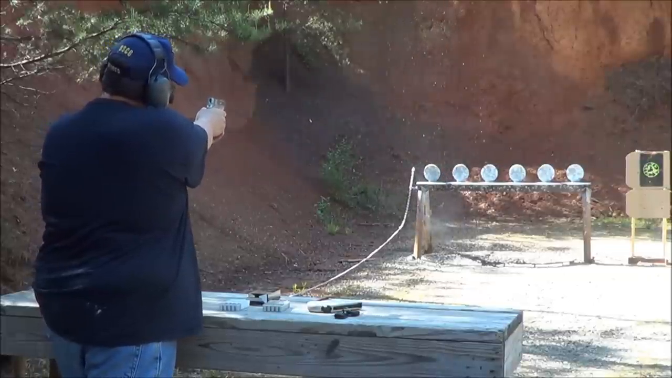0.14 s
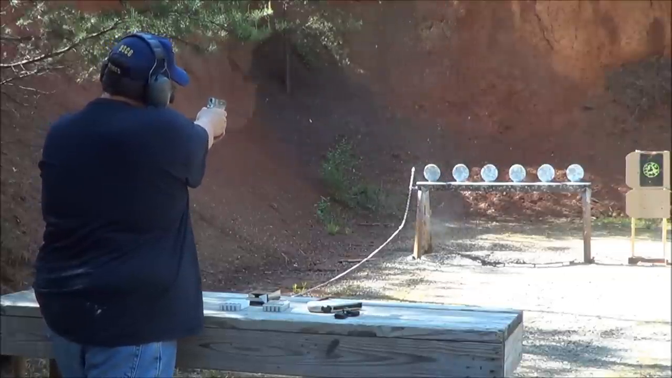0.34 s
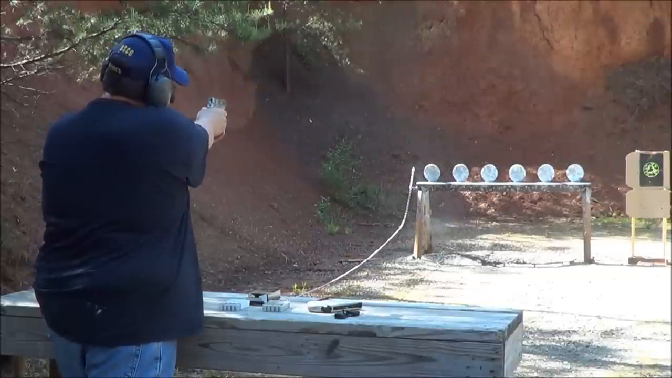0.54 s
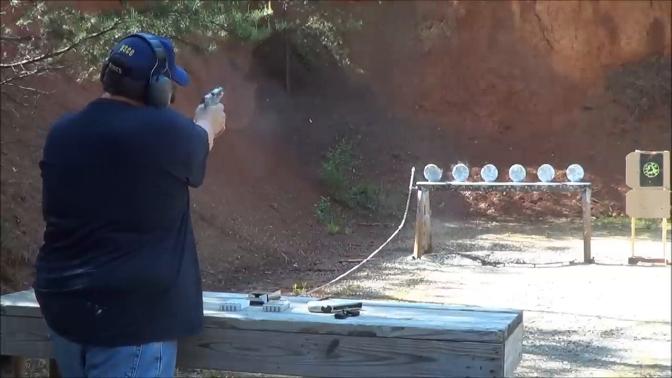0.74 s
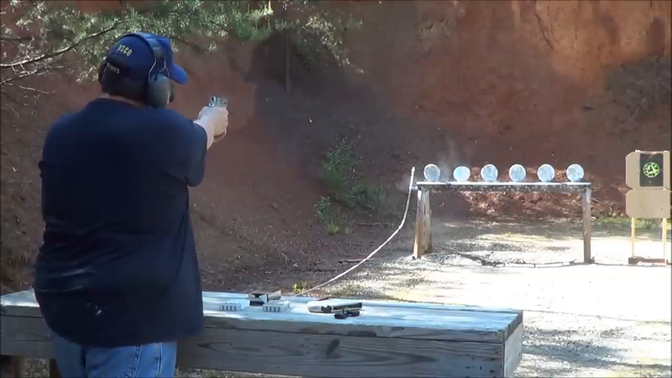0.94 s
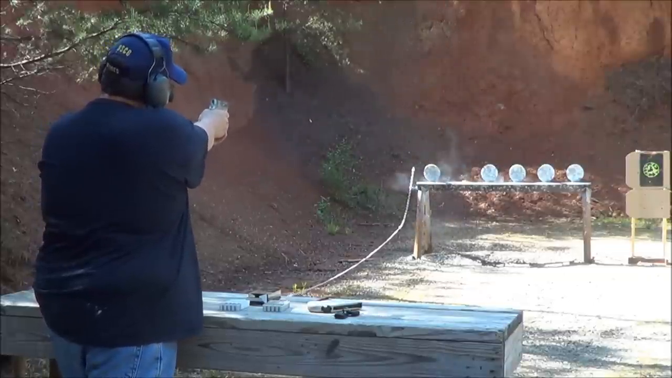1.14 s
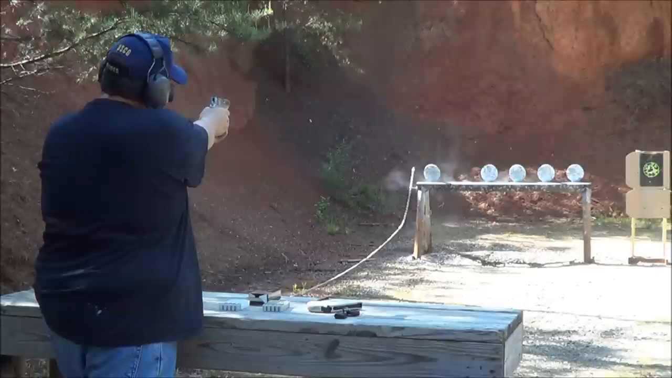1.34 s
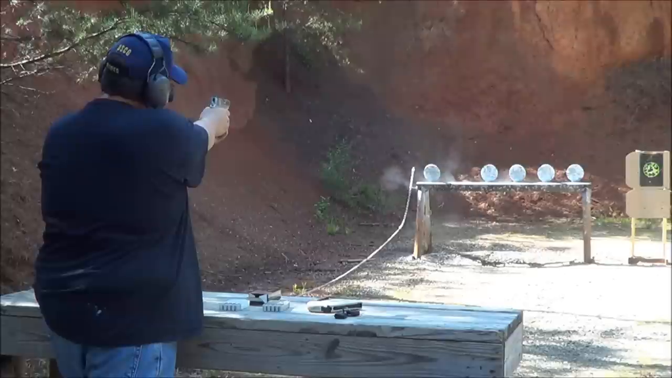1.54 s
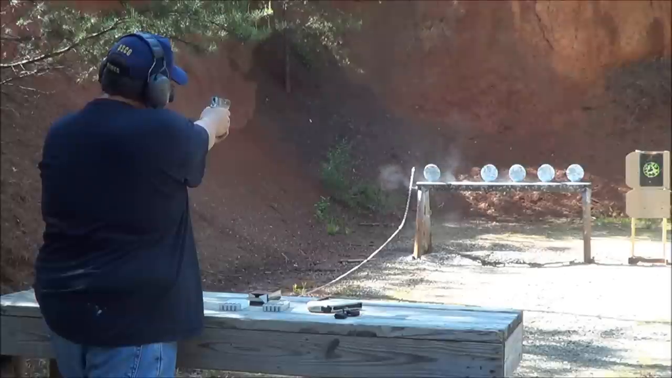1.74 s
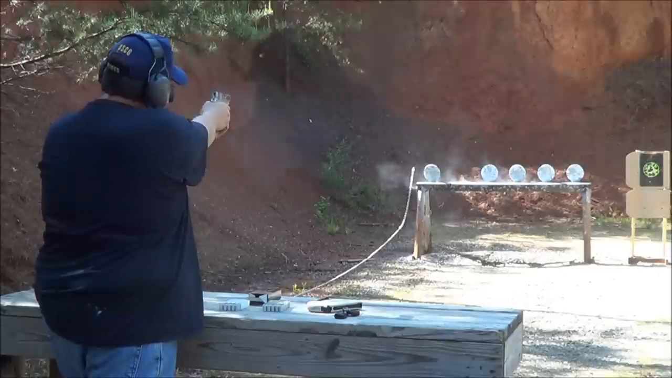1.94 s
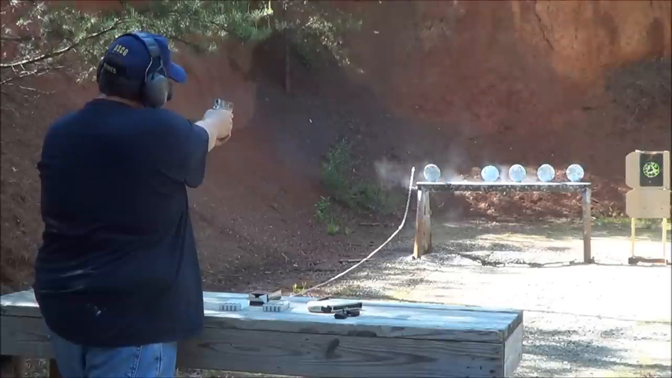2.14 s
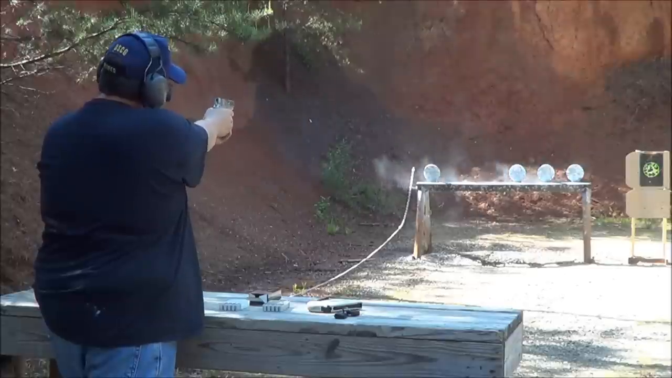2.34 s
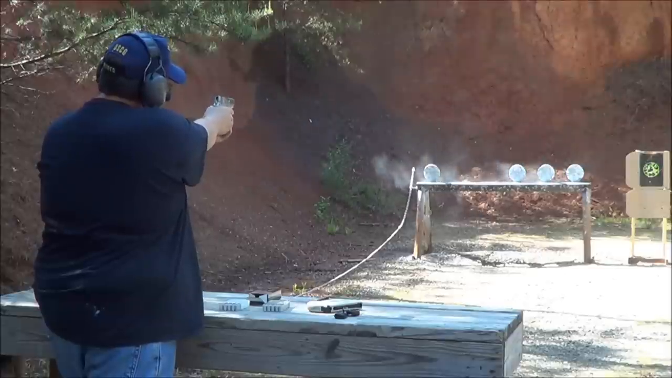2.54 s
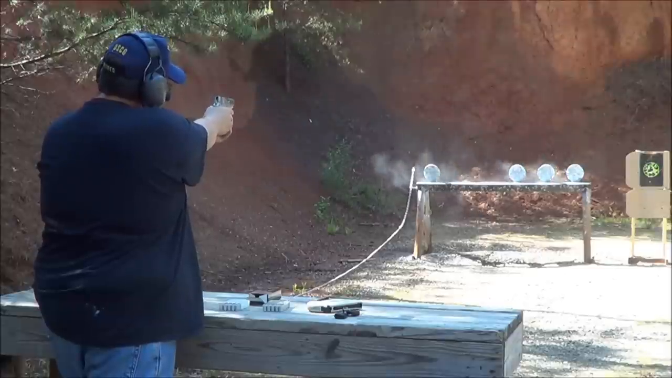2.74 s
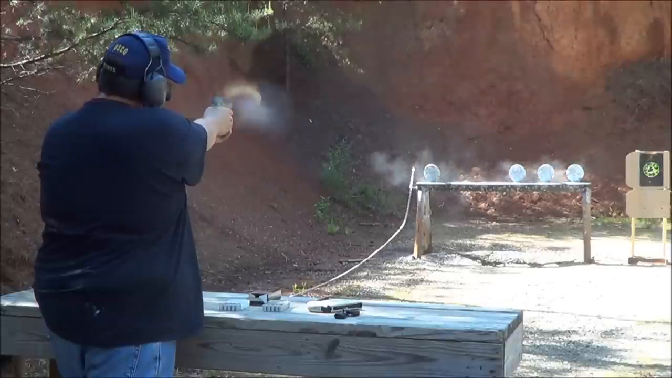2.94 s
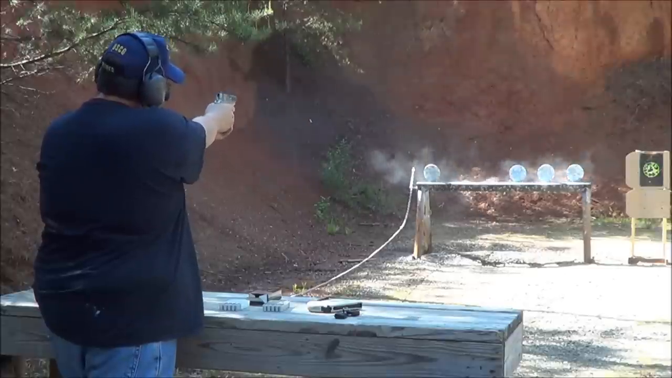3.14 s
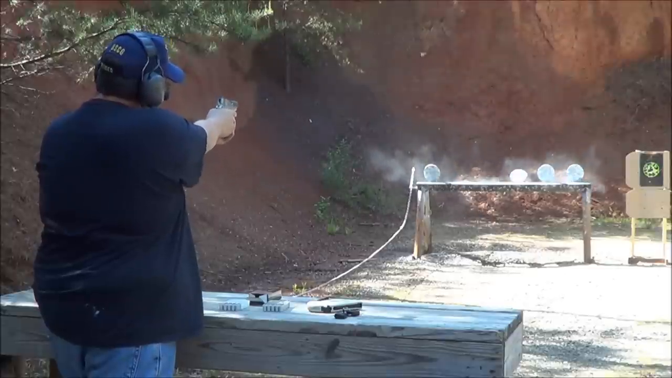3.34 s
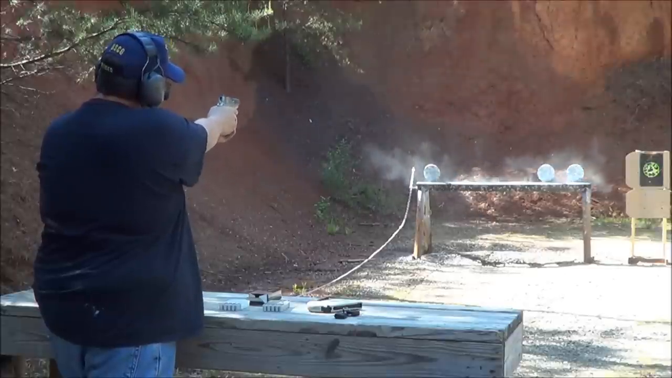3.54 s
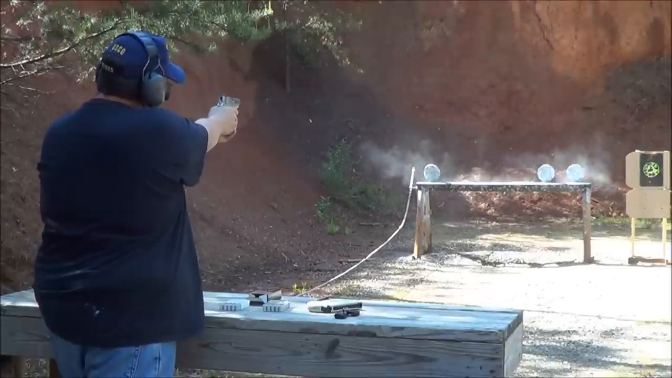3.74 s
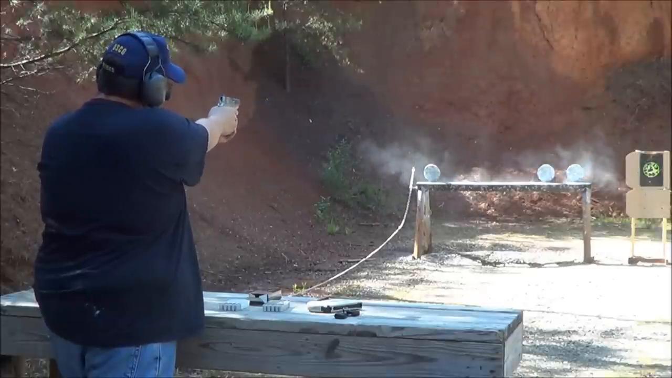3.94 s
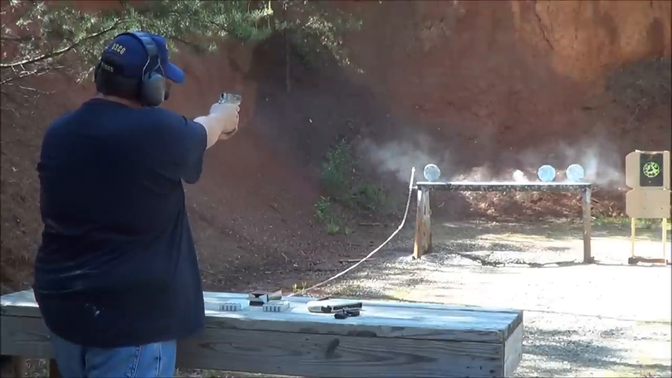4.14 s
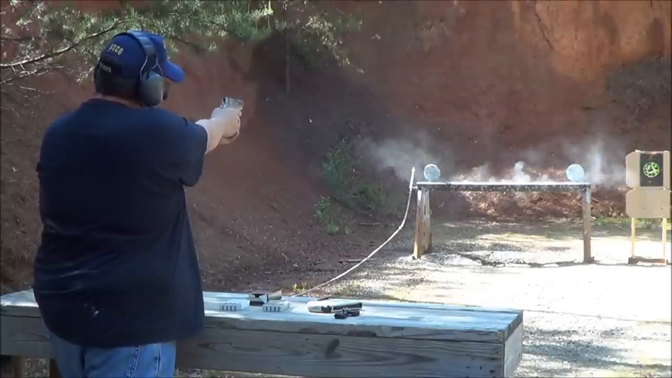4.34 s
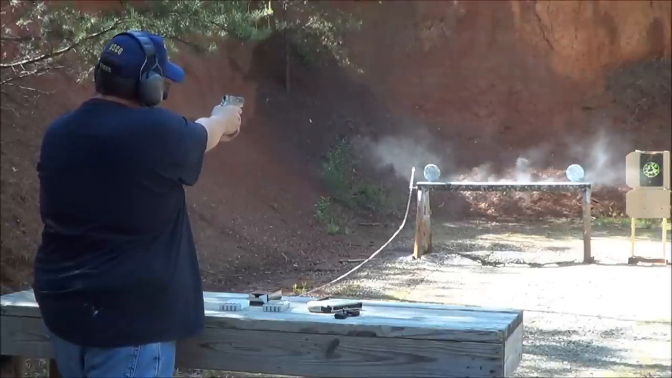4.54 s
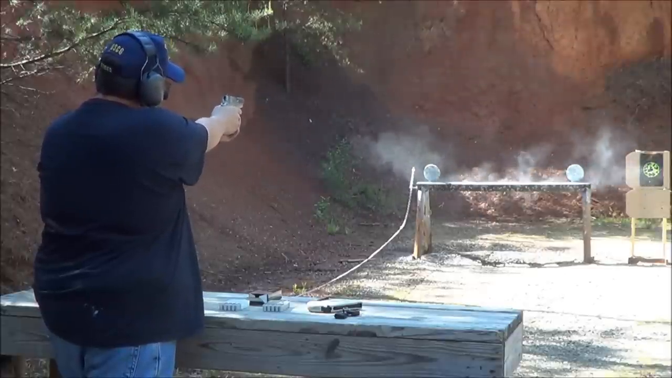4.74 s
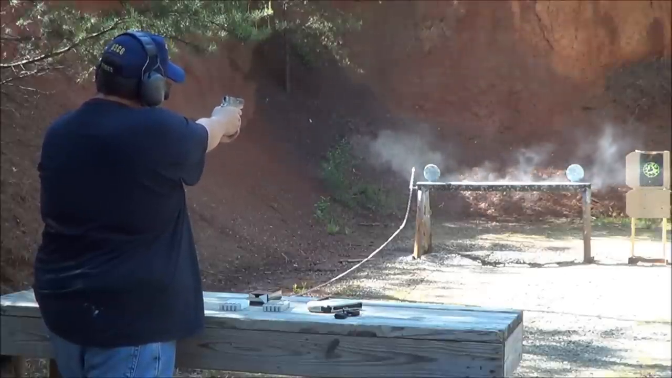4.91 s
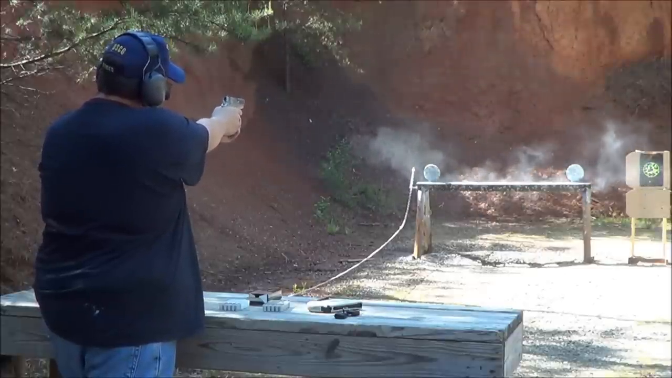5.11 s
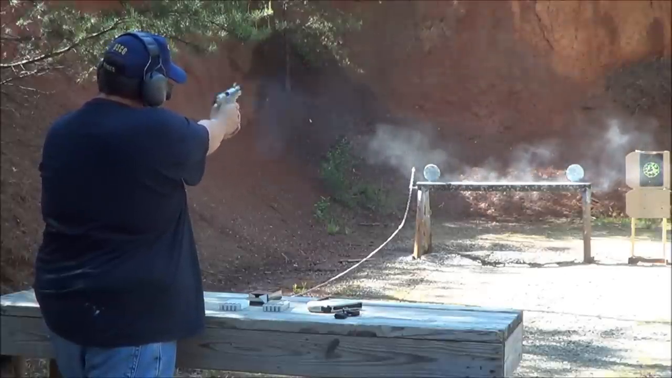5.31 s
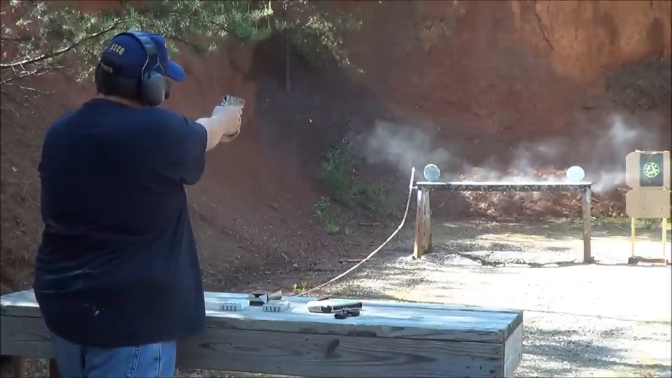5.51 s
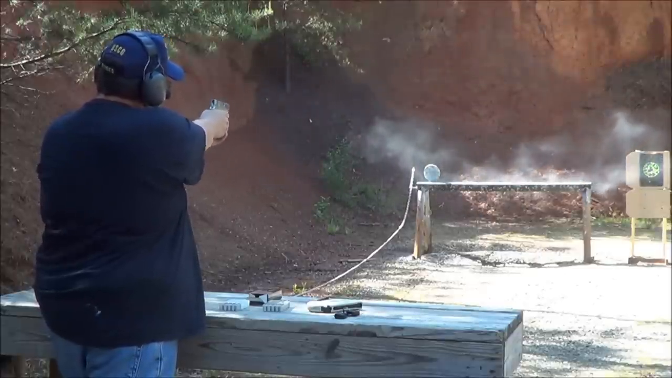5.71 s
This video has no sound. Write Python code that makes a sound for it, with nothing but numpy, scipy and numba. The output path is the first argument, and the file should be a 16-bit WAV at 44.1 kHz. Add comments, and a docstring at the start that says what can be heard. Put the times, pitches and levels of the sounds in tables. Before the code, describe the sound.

Five spaced pistol shots outdoors, each answered by a ringing steel plate and a clattering slam, with echoes rolling and brass cases tinkling.

```python
"""Five pistol shots at an outdoor range, each blast rolling round an earth bank and woods; an earlier one still echoes.
Blasts are bands of noise shaped by an opening crack, near and far echoes; plates and rack are fading modes and noise.
Bullets ring the steel plates, the plates slam back on their rack and bounce, and brass cases tinkle on the ground.
Behind lie a quiet outdoor hush of noise bands and a thin electronic whine.
The camera's stereo microphone pair feeds a limiter, then a bass cut, soft clipping and a treble cut."""
import sys
import numpy as np
from scipy import signal
from scipy.io import wavfile
from scipy.ndimage import uniform_filter1d, minimum_filter1d, map_coordinates
from numba import njit

SR = 44100
rng = np.random.default_rng(int(sys.argv[2]) if len(sys.argv) > 2 else 0)


def generate_wav(signal):
    """Clip the signal to [-1, 1] and save it as 16-bit WAV at the path in sys.argv[1]."""
    frames = np.transpose(np.atleast_2d(signal))
    scaled = np.clip(frames, -1, 1) * 32767
    pcm = np.round(scaled).astype(np.int16)
    wavfile.write(sys.argv[1], SR, pcm)


N = 254456  # samples in the scene
LEAD = SR + SR // 4  # samples played before the start
TOP_HZ = 16000
BANDS_HZ = 35 * 2 ** (np.arange(27) / 3)  # third-octave centres

# Width of the microphone pair. Each row: frequency in Hz, side minus mid in dB.
WIDTH = [(60, -9), (300, -12.5), (900, -6), (3000, -9.5), (7500, -4.5), (15000, -38)]
# Lean of the microphone pair. Each row: frequency in Hz, left minus right in dB.
LEAN = [(40, 2), (150, -2), (400, -3), (1200, -0.5), (15000, -0.1)]
# Colour of the outdoor hush. Each row: frequency in Hz, relative density in dB per Hz.
HUSH = [(24, -52), (40, -29), (108, 0.5), (606, -2), (998, 4.5), (4130, -19), (11800, -21.5), (13000, -49),
        (15500, -8)]
# Brass cases landing and bouncing.
# Each row: start in seconds, tick level in dB, mouth note in Hz, ring in Hz, ring level in dB.
CASE_LANDINGS = [(.001, -64, 5450, 12080, -45), (0.256, -28.5, 4350, 12060, -32.5),
                 (0.345, -33.5, 5400, 12030, -45), (.4677, -33.5, 5100, 12060, -39),
                 (0.503, -34, 4740, 12030, -32), (.548, -44, 4860, 12030, -43),
                 (.601, -50, 5000, 12000, -43.5), (.657, -49, 5500, 12030, -58),
                 (1.5837, -21, 5415, 11510, -28.5), (2.272, -45, 5600, 11400, -37),
                 (2.726, -21, 5355, 11540, -24.5), (3.215, -50, 5500, 11504, -27),
                 (3.385, -55, 5500, 11510, -38), (3.843, -16, 5600, 11580, -28.5),
                 (4.802, -42, 5670, 11562, -47), (4.8586, -17.5, 5100, 11430, -24.5),
                 (5.0276, -45, 12500, 11400, -65)]
# Plates slamming on the rack and bouncing. Each row: start in seconds, level in dB, share of the full ringing time.
PLATE_SLAMS = [(1.2130, -10, 1.6), (1.2742, -35, 1.1), (2.4359, -9, 1.14), (2.636, -21.5, 0.54),
               (2.713, -29.5, 2.5), (2.772, -28.5, 0.86), (2.874, -33, 0.94), (2.955, -28.5, 1.1),
               (3.5501, -12.5, 1.45), (3.711, -23.5, 1.83), (3.921, -34.5, 0.75), (4.4400, -11.5, 1.23),
               (4.592, -24.5, 1.54), (5.7598, -14, 1.5)]
# First crack of steel on steel. Each row: centre in Hz, relative level in dB, full t60 in seconds.
CLANG_BANDS = [(158, -31.5, 0.24), (1690, -8.5, 0.22), (2080, -18.5, 0.99), (3170, -11, 0.56),
               (10600, -19, 0.16)]
# Clatter of the rack. Each row: frequency in Hz, relative level in dB, full t60 in seconds.
RATTLE_BANDS = [(120, -59, 0.11), (387, -8, 0.35), (930, -8, 0.68), (1600, -3.5, 0.76), (3000, -2.5, 0.71),
                (5030, -1, 0.66), (7940, -8.5, 0.56), (11230, 7.5, 0.47), (15300, -50, 0.19)]
# Modes of the rack. Each row: frequency in Hz, relative level in dB, full t60 in seconds.
RACK_MODES = [(1470, -13, 0.31), (1894, -12, 0.32), (1964, -17, 0.25), (2320, -20.5, 0.58),
              (2480, -20, 0.52), (2580, -41, 0.18), (2790, -14.5, 0.28), (3123, -16, 0.66),
              (3173, -20.5, 0.83), (3540, -30, 0.59), (3950, -36, 0.28), (5260, -14.5, 0.15),
              (10800, -22, 0.35), (10720, -15.5, 0.33)]
# Ringing of a plate. Each row: frequency in Hz, level in dB when struck near its belly, t60 in seconds.
PLATE_MODES = [(2589, -20, 1.36), (5450, -23, 1.3), (5790, -23, .4), (8818, -24, .7), (9082, -16, .55),
               (9297, -17, .57), (9873, -18, .3), (10066, -19, .5), (14335, -40, .98)]
# Bullet strikes. Each row: start in seconds, ring level in dB,
# places in PLATE_MODES of the modes whose bellies the bullet lands near.
BULLET_STRIKES = [(.836, 0, [4, 6]), (1.974, 0, [0, 1, 3, 8]), (3.075, -5, [2, 3, 4, 7]),
                  (4.101, -2, [3, 5, 8]), (5.405, -3, [0, 2, 7])]
# Lead splashing off the plate. Each row: centre in Hz, level in dB, t60 in seconds.
LEAD_SPLASH = [(5500, -15, 0.21), (9900, -21, 0.39)]
# The range answering a blast.
# Each row: frequency in Hz, near echoes in dB, their t60 in seconds, far woods in dB, their t60 in seconds.
RANGE_ANSWER = [(40.4, -23, 0.36, -59, 2.3), (121, -48.5, 1, -53.5, 2.4), (159, -16.5, 0.46, -66, 2.2),
                (255, -14.5, 0.24, -33, 2.24), (443, -13, 0.56, -22, 2.55), (1030, -7.5, 0.66, -12, 2.1),
                (1500, -7.5, 0.27, -16.5, 1.77), (2390, -8.5, 0.89, -15.5, 1.96),
                (2780, -10.5, 0.87, -24, 1.92), (3940, -9.5, 0.74, -17.5, 1.52),
                (7900, -12, 0.75, -39, 1.4), (10270, -3.5, 0.55, -57, 0.67), (15000, -19, 0.3, -62, 0.79)]
# The crack of the shot itself, then ground, bench and walls near the shooter, then the bank and tree lines.
# Each row: delay in seconds, gain over the near echoes in dB, spread in seconds, centre in Hz, width in octaves.
CRACK_AND_REFLECTORS = [(0, 25, 0.0054, 4500, 7), (.004, 19, 0.012, 2440, 3.9),
                        (0.017, 9, 0.018, 1400, 1.4), (0.036, 9.5, 0.0053, 1160, 2.2),
                        (0.071, 19, 0.0044, 1520, 1.6), (0.103, 14, 0.0076, 410, 0.58),
                        (.142, 22.5, 0.018, 483, .45), (.175, 16, 0.016, 224, 0.89),
                        (.32, 15, 0.055, 585, 0.2), (0.366, 29, 0.059, 262, 0.47)]
# The five shots, each a start in seconds.
SHOT_TIMES = [.7577, 1.8935, 2.9930, 4.0182, 5.3352]
# The shot before them: start in seconds, level in dB.
EARLIER_SHOT = (-1.0, 0)

AIR_DB = -53.5
WHINE_HZ, WHINE_DB = 15740, -78  # level is rms
CASE_T60_S, BEAT_HZ = 0.31, 75  # ring of a case; typical split of its mode pair
MOUTH_T60_S, MOUTH_DB = 0.0055, 2.5  # level relative to the tick
STEEL_PAN = 0.16  # each steel mode beams its own way: spread of the side share
SLAM_RISE_S, RISE_LOG_PER_DB = 0.0011, -0.08  # rise of the loudest slam; log change per dB below it
OFF_BELLY_DB = -17  # plate modes away from whose bellies the bullet lands
BLAST_DB = -3.5
LUMPS_DB, LUMPS_PER_S = 1.6, 90  # returns arrive in clumps
LIMIT_DB, LIMIT_RATIO = -10, 10.3
ATTACK_S, RELEASE_S, AHEAD = .0002, .012, 100  # AHEAD in samples
LOW_CUT_HZ = 187


def undb(db):
    """dB to gain."""
    return 10 ** (np.asarray(db) / 20)


def column(table, hz, order):
    """One column of a table, read on a log frequency axis."""
    rows = np.array(table)
    return np.interp(np.log(hz), np.log(rows[:, 0]), rows[:, order])


def fade(t, t60):
    """Falls 60 dB in t60 seconds."""
    return np.exp(-np.log(1000) * t / t60)


def walk(size, rate):
    """Random wander: levels drawn rate times a second, smoothed twice."""
    k = int(SR / rate)
    steps = np.repeat(rng.standard_normal(size // k + 1), k)
    return uniform_filter1d(uniform_filter1d(steps, size=k), size=k)[:size]


def add(track, s, sound):
    """Mix a sound in, s seconds after the start."""
    i = LEAD + int(s * SR)
    n = min(sound.shape[-1], track.shape[-1] - i)
    track[..., i:i + n] += sound[..., :n]


def band_noise(hz, size, octaves=1 / 3):
    """A band of stereo noise, as wide and as leaning as the microphone pair hears it."""
    half = 2 ** (octaves / 2)
    sos = signal.butter(2, [hz / half, min(hz * half, TOP_HZ)], "band", fs=SR, output="sos")
    noise = signal.sosfilt(sos, rng.standard_normal((2, size + 4096)))
    # drop the filter's start; offset the bandwidth growing with frequency
    mid, side = noise[:, 4096:] * np.sqrt(SR / hz)
    sign = np.array([[1], [-1]])  # left, right
    stereo = mid + sign * undb(column(WIDTH, hz, order=1)) * side
    return stereo * undb(sign * column(LEAN, hz, order=1) / 2)


def ring(hz, db, t60, length_s, waver_db, rate, pan=0.):
    """Sum of fading modes; a turning, rattling body makes each one waver."""
    t = np.arange(int(length_s * SR)) / SR
    phases = 2 * np.pi * rng.random(len(hz))
    side = pan * rng.standard_normal(len(hz))
    modes = []
    for f, level_db, decay, phase in zip(hz, db, t60, phases):
        level = undb(level_db + waver_db * walk(len(t), rate))
        modes.append(level * fade(t, decay) * np.sin(2 * np.pi * f * t + phase))
    return np.array([1 + side, 1 - side]) @ np.array(modes)


def air(size):
    """Quiet outdoor hush of shaped noise bands, and a thin steady electronic whine."""
    hush = sum(undb(column(HUSH, hz, order=1)) * np.sqrt(hz) * band_noise(hz, size=size, octaves=2 / 3)
               for hz in BANDS_HZ[::2])
    whine = undb(WHINE_DB) * np.sqrt(2) * np.sin(2 * np.pi * WHINE_HZ * np.arange(size) / SR)
    return hush * undb(AIR_DB) / np.std(hush) + whine


def cases(track):
    """A sharp tick scattering off the ground, the short hollow note of the case mouth, a beating pair of wall modes."""
    t = np.arange(SR // 8) / SR
    for s, tick_db, mouth_hz, hz, ring_db in CASE_LANDINGS:
        click = np.diff(rng.standard_normal(len(t) + 1)) * fade(t, 0.0033)
        knock = undb(-7) * fade(t, 0.013) * band_noise(7800.0, size=len(t), octaves=1.5)
        scatter = undb(-23.0) * fade(t, 0.14) * band_noise(7800.0, size=len(t), octaves=1.3)
        mouth = undb(MOUTH_DB) * fade(t, MOUTH_T60_S) * np.sin(2 * np.pi * mouth_hz * t)
        add(track, s, undb(tick_db) * (0.5 * click + knock + mouth + scatter))
        # each landing splits the pair differently
        beat_hz = BEAT_HZ * np.exp(0.54 * rng.standard_normal())
        pair_hz = [hz - beat_hz / 2, hz + beat_hz / 2]
        walls = ring(pair_hz, [ring_db, ring_db - 6.5], [CASE_T60_S] * 2,
                     length_s=0.49, waver_db=4.0, rate=144.0)
        add(track, s, walls)


def rack(track):
    """Steel on steel: a dense clang, a rattling tail that flickers band by band, the rack's modes inside it."""
    hz, mode_db, t60 = np.transpose(RACK_MODES)
    loudest = max(db for _, db, _ in PLATE_SLAMS)
    for s, db, share in PLATE_SLAMS:
        length_s = .75 * min(share, 1)
        t = np.arange(int(length_s * SR)) / SR
        clang = sum(undb(d) * fade(t, share * decay) * band_noise(f, size=len(t), octaves=0.5)
                    for f, d, decay in CLANG_BANDS)
        rattle = 0
        for f in BANDS_HZ[4::2]:
            flicker = undb(column(RATTLE_BANDS, f, order=1) + 1.3 * walk(len(t), 56.5))
            tail = fade(t, share * column(RATTLE_BANDS, f, order=2))
            rattle = rattle + flicker * tail * band_noise(f, size=len(t), octaves=2 / 3)
        modes = ring(hz, mode_db, share * t60, length_s, waver_db=5, rate=220., pan=STEEL_PAN)
        # weaker slams rise faster
        rise_s = SLAM_RISE_S * np.exp(RISE_LOG_PER_DB * (loudest - db))
        envelope = np.minimum(t / rise_s, 1) * (1 - t / t[-1])
        add(track, s, undb(db) * (clang + undb(-11.5) * rattle + modes) * envelope)


def plates(track):
    """A bullet splashes on the plate and sets it ringing; the ring dies away as the plate tips back."""
    hz, db, t60 = np.transpose(PLATE_MODES)
    t = np.arange(SR // 2) / SR
    for s, strike_db, struck in BULLET_STRIKES:
        splash = sum(undb(d) * fade(t, decay) * band_noise(f, size=len(t), octaves=0.31)
                     for f, d, decay in LEAD_SPLASH)
        off_belly = ~np.isin(np.arange(len(db)), struck)
        mode_db = db + strike_db + OFF_BELLY_DB * off_belly
        ringing = ring(hz, mode_db, t60, length_s=.5, waver_db=7.0, rate=56.0, pan=STEEL_PAN)
        add(track, s, splash + ringing * np.cos(np.pi * t))  # silent at half a second


def blast_and_echo():
    """One blast, band by band: its opening crack and single reflectors, scattered near echoes, far woods."""
    t, out = np.arange(2 * SR) / SR, 0
    shapes = [np.clip(4 * (t - s) / spread, 0, 1) * np.exp(-np.abs(t - s) / spread)
              for s, _, spread, _, _ in CRACK_AND_REFLECTORS]
    for hz in BANDS_HZ:
        near = undb(column(RANGE_ANSWER, hz, order=1)) * fade(t, column(RANGE_ANSWER, hz, order=2))
        far = undb(column(RANGE_ANSWER, hz, order=3)) * fade(t, column(RANGE_ANSWER, hz, order=4))
        bumps = 0
        for (_, db, _, mid_hz, width), shape in zip(CRACK_AND_REFLECTORS, shapes):
            colour = np.exp(-(np.log2(hz / mid_hz) / width) ** 2 / 2)
            bumps = bumps + undb(db) * colour * shape
        lumps = undb(LUMPS_DB * walk(len(t), LUMPS_PER_S))
        out = out + (near * (1 + bumps) + far) * lumps * band_noise(hz, size=len(t))
    return out


def shots(track):
    """The same range answers every blast; moving air shifts the paths by a few centimetres each time."""
    echo = blast_and_echo()
    i = np.arange(echo.shape[1])
    for s, db in [EARLIER_SHOT] + [(s, BLAST_DB) for s in SHOT_TIMES]:
        paths = i + 5 * walk(len(i), 25)  # in samples
        blast = np.array([map_coordinates(c, [paths], order=3) for c in echo])
        add(track, s, undb(db) * blast)


@njit
def follow(x, attack, release):
    """Level follower, quick up and slow down."""
    e, y = 0., np.empty(len(x))
    for i in range(len(x)):
        e += (x[i] - e) * (attack if x[i] > e else release)
        y[i] = e
    return y


def limiter(x):
    """One gain for both channels, pulled down above the limit; it sees each peak about two milliseconds ahead."""
    e = follow(np.abs(x).max(axis=0), 1 / (ATTACK_S * SR), 1 / (RELEASE_S * SR))
    gain = np.minimum(1, undb(LIMIT_DB) / (e + 1e-9)) ** (1 - 1 / LIMIT_RATIO)
    ahead = minimum_filter1d(gain, size=AHEAD, origin=-AHEAD // 2)
    return x * uniform_filter1d(ahead, size=33)


def scene():
    """All sources, background first; the limiter already listens before the start."""
    track = air(size=LEAD + N)
    for source in (cases, rack, plates, shots):
        source(track)
    return limiter(track)[:, LEAD:]


def record(dry):
    """Thins the bass, rounds the highest peaks and cuts the top."""
    bass_cut = signal.butter(1, LOW_CUT_HZ, "high", fs=SR, output="sos")
    rounded = np.tanh(1.214 * signal.sosfilt(bass_cut, dry)) / 1.27
    top_cut = signal.ellip(8, .2, 70, TOP_HZ, fs=SR, output="sos")
    return signal.sosfilt(top_cut, rounded)


dry = scene()
out = record(dry)
generate_wav(out)
```